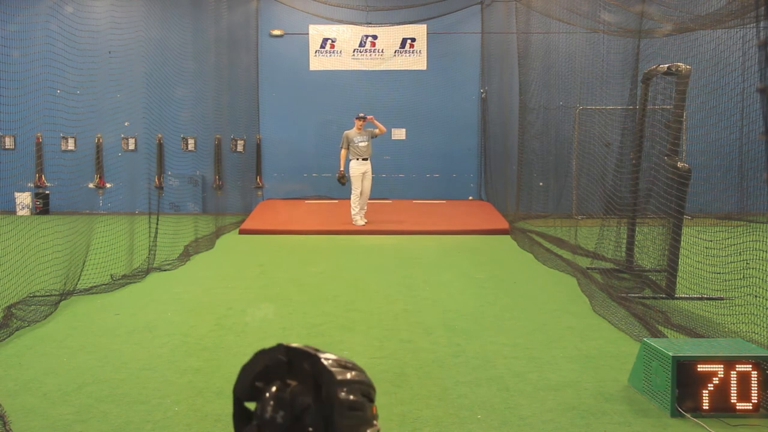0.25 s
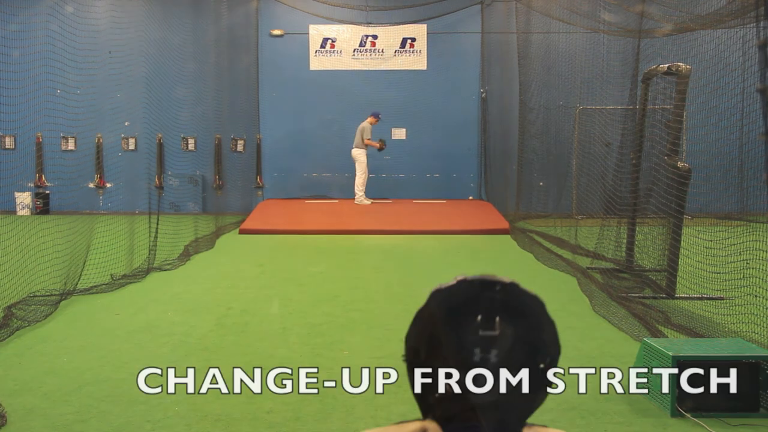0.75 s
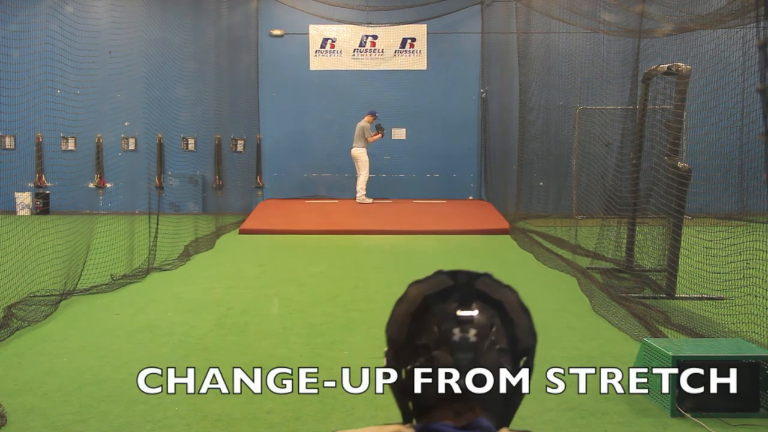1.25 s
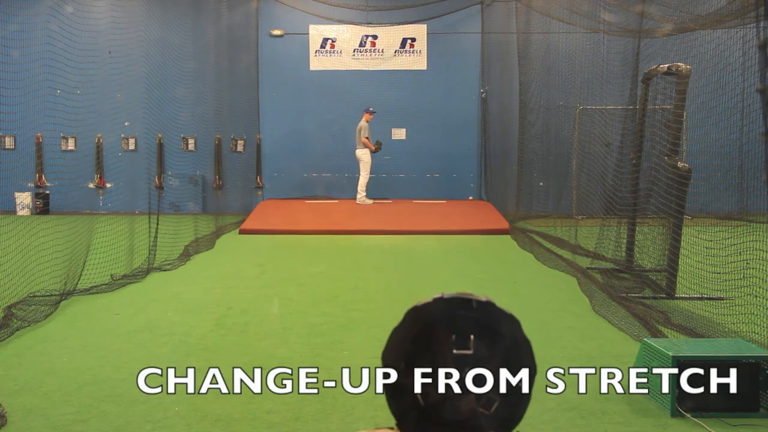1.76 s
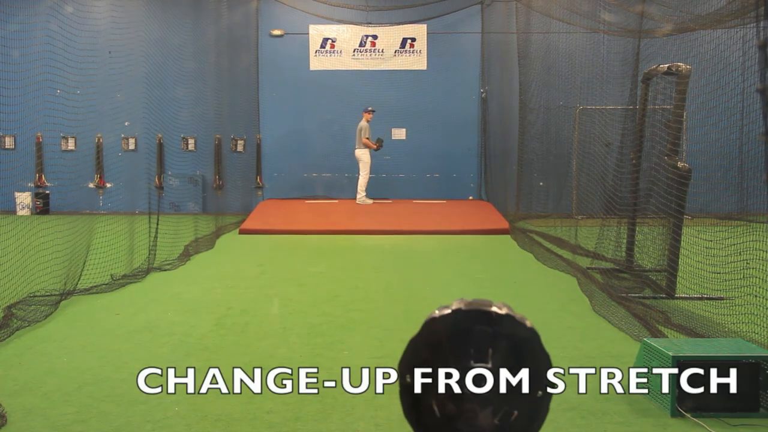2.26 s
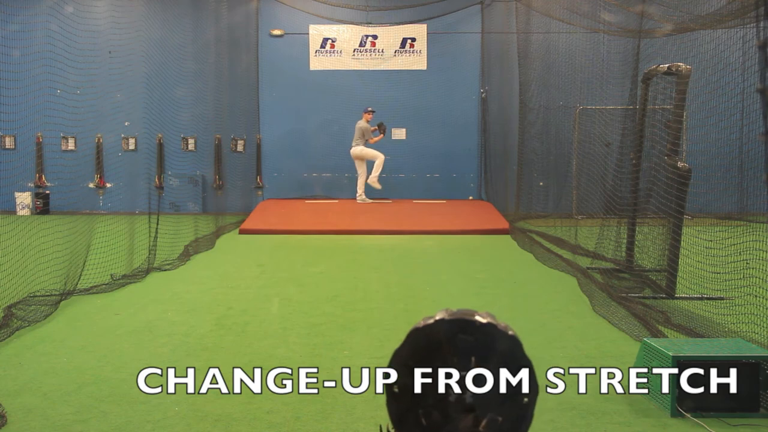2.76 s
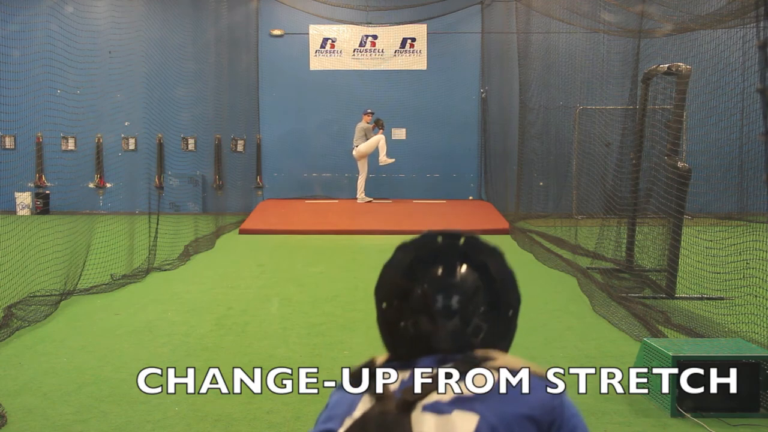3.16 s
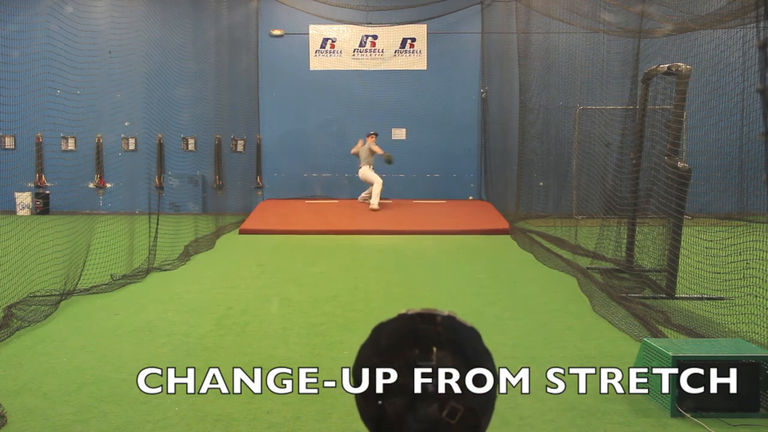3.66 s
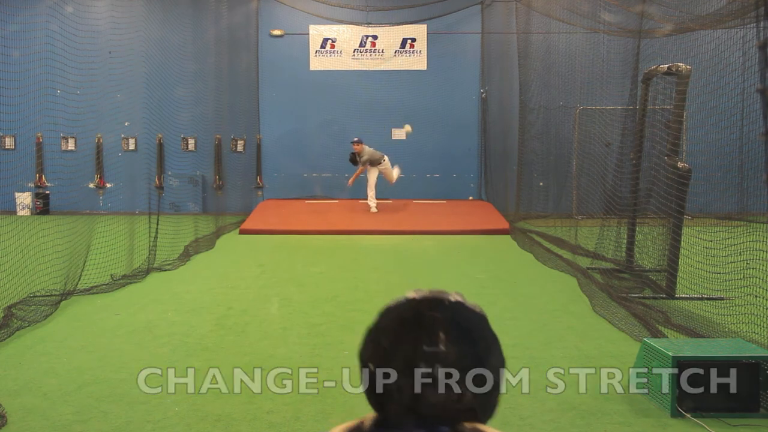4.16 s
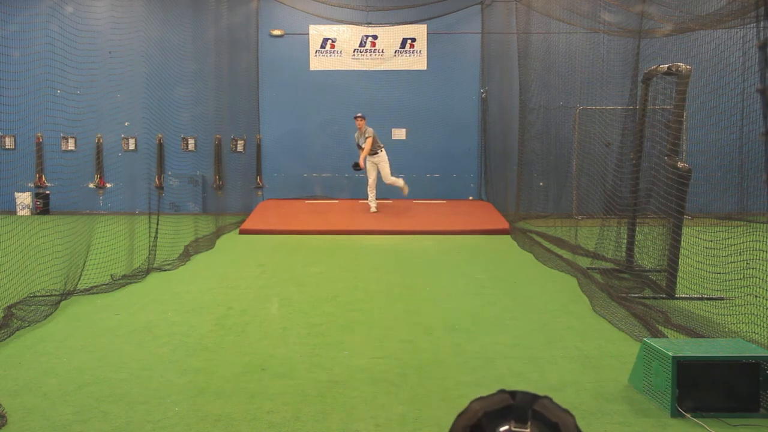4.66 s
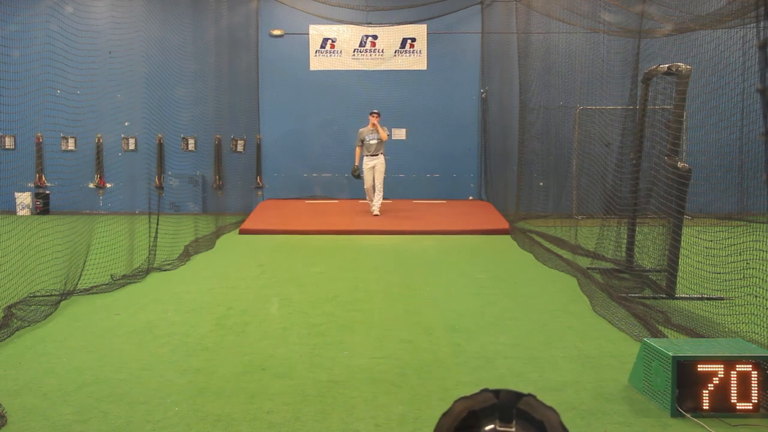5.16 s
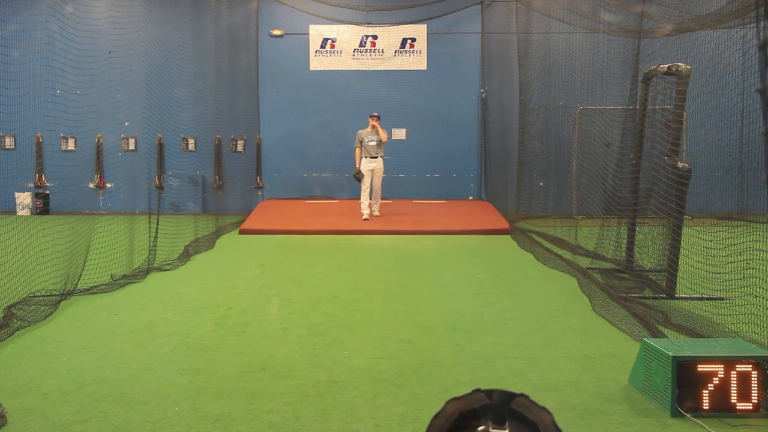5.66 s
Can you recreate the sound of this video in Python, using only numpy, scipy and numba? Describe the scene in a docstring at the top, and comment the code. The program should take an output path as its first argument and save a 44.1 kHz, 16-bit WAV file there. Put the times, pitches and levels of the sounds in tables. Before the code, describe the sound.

Low unsteady ventilation hum in a large hard-walled hall. Quiet fabric rubs and bright little buckle ticks, then a sharp shoe scuff on artificial turf and a muffled distant foot slide. Suddenly a ball hits a leather mitt near the microphone: a very loud, clipped, hollow pop. Slapping echoes bounce between the end walls, getting duller, while a mid-pitched reverberant ring slowly fades under a few faint clicks.

```python
"""An indoor batting cage, heard from just behind the catcher: wavering fan tones and filtered noise for air.
Noise swells for rubbing cloth and shoes dragging on turf, and short bursts tick for the catcher's gear.
The pitcher strides, and the ball smacks into the leather mitt: decaying sines plus bursts of noise.
Echo bursts and decaying bands of noise answer as the hall; the rubs and ticks are convolved with it.
The pop overloads the microphone; its gain control ducks, then recovers under the long ring."""
import sys
import numpy as np
from scipy import signal
from scipy.fft import rfft, irfft
from scipy.io import wavfile
from numba import njit

SR = 44100
rng = np.random.default_rng(int(sys.argv[2]) if len(sys.argv) > 2 else 0)


def store_pcm(level_fs):
    """Save levels as 16-bit WAV."""
    pcm = np.round(np.clip(level_fs, -1, 1) * 32767).astype(np.int16)
    wavfile.write(sys.argv[1], SR, np.atleast_2d(pcm).T)


N = 260278
T = np.arange(N) / SR  # seconds
FREQS = np.maximum(np.arange(N // 2 + 1) * SR / N, 1)  # Hz, kept above zero for logarithms
CATCH_S = 4.5516


def undb(db):
    """Level law: decibels to amplitude gain."""
    return 10 ** (np.asarray(db) / 20)


def unit(x):
    """Normalization: scale to rms 1."""
    return x / np.sqrt(np.mean(x ** 2))


def at(hz, table, axis=1):
    """Spectral interpolation: read a table's column on a log-frequency axis."""
    rows = np.array(table, float)
    return np.interp(np.log(hz), np.log(rows[:, 0]), rows[:, axis])


def noise(gain):
    """Spectral shaping: Gaussian noise of rms 1 with the given gain at each frequency."""
    spectrum = rng.standard_normal(len(FREQS)) + 1j * rng.standard_normal(len(FREQS))
    return unit(irfft(gain * spectrum, N))


def third(hz):
    """Band filtering: noise around one third-octave center, overlapping its neighbours."""
    power = np.maximum(1 - 3 * np.abs(np.log2(FREQS / hz)), 0)
    return noise(np.sqrt(power))


def dull(edge_hz):
    """First-order low-pass: gain of a gentle treble loss above the edge."""
    return 1 / np.sqrt(1 + (FREQS / edge_hz) ** 2)


def walk(rate_hz):
    """Random modulation: slow Gaussian noise of rms 1, limited to about the given rate."""
    return noise(np.exp(-np.minimum(FREQS / rate_hz, 20) ** 2))


def fade(start, t60):
    """Exponential decay: silence, then a fall of 60 dB in t60 seconds."""
    return (T >= start) * np.exp(-np.minimum(np.log(1000) * np.abs(T - start) / t60, 40))


def burst(start, t60, gain, size=32768):
    """Minimum-phase filtering: decaying noise is coloured without sounding before its start."""
    gain = np.interp(np.linspace(0, SR / 2, size // 2 + 1), FREQS, unit(gain))
    # folding the cepstrum forward in time makes the filter causal
    cepstrum = irfft(np.log(gain))
    cepstrum[1:size // 2] *= 2
    cepstrum[size // 2 + 1:] = 0
    grains = np.exp(-np.log(1000) * T[:size] / t60) * rng.standard_normal(size)
    sound = irfft(rfft(grains) * np.exp(rfft(cepstrum)))
    return np.concatenate([np.zeros(int(start * SR)), sound, np.zeros(N)])[:N]


def swell(peak_s, rise_s, fall_s):
    """Frictional envelope: the pressure of a rub rises smoothly to 1 and falls smoothly."""
    scale_s = np.where(T < peak_s, rise_s, fall_s)
    return 1 / np.cosh(np.clip((T - peak_s) / scale_s, -20, 20)) ** 2


# Fan and motor tones. Each row: frequency in Hz, mean level in dB rms, frequency wander in Hz.
HUM = [(57.6, -45, 0.34), (118.5, -49.5, 1.02), (181.6, -43, 2.69), (215.4, -40, 1.29), (243.5, -45, 0.91),
       (286.2, -44, 1.6), (353.6, -57, 1.13), (409.6, -53, 1.33), (461, -50, 1.34), (530, -51.5, 1.75),
       (678.4, -49.5, 3.06), (694, -42, 1.52), (1110, -61, 1.3), (1142, -58.5, 1.63), (1176, -59.5, 1.2)]
# Rush of the ventilation. Each row: frequency in Hz, relative level in dB per third octave.
AIR = [(25, -73.5), (45, -57), (75, -57), (130, -48), (200, -42), (290, -41.5), (400, -46.5), (600, -45),
       (900, -51), (1300, -52.5), (2500, -61), (5000, -68), (9000, -69), (12500, -71.5), (16000, -77)]


def fans(air_db=-35.5, flicker_db=1.0, waver_db=1.04):
    """Frequency and amplitude modulation: motor and blade tones waver in the rush of moving air."""
    tones = 0
    for hz, db, wander_hz in HUM:
        phase = 2 * np.pi * np.cumsum(hz + wander_hz * walk(5.58)) / SR
        level_db = db + waver_db * np.minimum(wander_hz, 1) * walk(8.0)
        tones = tones + np.sqrt(2) * undb(level_db) * np.sin(phase)
    air = noise(undb(at(FREQS, AIR)) / np.sqrt(FREQS))  # per third octave to per Hz
    return tones + undb(air_db + flicker_db * walk(10.0)) * air


# Ring of the hall. Each row: frequency in Hz, relative level in dB per third octave, t60 in seconds.
HALL = [(70, -49, 2), (121, -22.5, 1.4), (169, -16.5, 2.9), (245, -6, 2.63), (464, -4, 2.67),
        (680, -8, 2.7), (880, -4.5, 2.24), (1250, -7.5, 2.18), (1996, -3.5, 1.46), (2680, -11, 1.23),
        (4070, -10, 1.02), (8000, -17.5, 0.49), (12000, -20, 0.31), (16000, -31, 0.42)]
THIRDS = 25 * 2 ** (np.arange(29) / 3)  # third-octave centers, Hz


def hall_response(build_s=0.15, build_corner_hz=3000, far_wall_s=0.11, early_corner_hz=750,
                  early_bass=0.43, bloom_hz=900, bloom_width_hz=70, bloom_db=6.5):
    """Reverberation: treble arrives first and dies fast, lows gather late and stay."""
    ring = 0
    returned = np.clip((T - far_wall_s) / 0.0061, 0, 1)
    for hz in THIRDS[THIRDS > 50]:
        # most of the bass passes through the nets and only returns from the far wall
        early = max(early_bass, 1 / np.sqrt(1 + (early_corner_hz / hz) ** 4))
        gather = 1 - np.exp(-T * (1 + hz / build_corner_hz) / build_s)
        build = gather * (early + (1 - early) * returned)
        decay = fade(0, at(hz, HALL, axis=2))
        ring = ring + undb(at(hz, HALL)) * build * decay * third(hz)
    # one narrow band sings out over the rest
    bloom = 1 + (undb(bloom_db) - 1) / (1 + 1j * (FREQS - bloom_hz) / bloom_width_hz)
    return irfft(rfft(ring) * bloom, N)


# Rubbing fabric. Each row: frequency in Hz, relative level in dB per Hz.
CLOTH = [(300, -33.5), (900, -4), (1600, -4), (2400, -0.5), (3600, -8), (5200, -12), (10000, -16.5),
         (13000, -22.5), (16000, -34)]
# Weight shifts of the catcher. Each row: peak time in seconds, relative level in dB,
# time scale of rise and fall in seconds.
SHIFTS = [(0, -55, 0.075), (.54, -48, 0.21), (0.865, -54.5, 0.1), (2.35, -59.5, 0.1), (2.696, -56.5, .07),
          (2.98, -51.5, 0.076), (4.467, -47.5, 0.16), (5.22, -51.5, 0.14), (5.85, -62.5, .12)]


def clothes(rest_db=-63.5, cloth_db=1, grain_db=2.0):
    """Friction noise: clothes and pads rub in fine grains as the catcher shifts, never quite still."""
    effort = undb(rest_db) + sum(undb(db) * swell(s, scale_s, scale_s) for s, db, scale_s in SHIFTS)
    grain = undb(cloth_db + grain_db * walk(300))
    return effort * grain * noise(undb(at(FREQS, CLOTH)))


# Small ticks of the catcher's gear. Each row: start in seconds, relative level in dB, pitch in Hz.
TICKS = [(.233, -35, 8000), (.357, -35, 11000), (2.168, -36, 8000), (3.578, -42, 10500), (5.165, -35, 9500),
         (5.198, -32.5, 9500), (5.239, -37, 9500), (5.396, -34, 10600)]


def gear(tick_db=-9, t60=0.022, width_hz=2600, count=20, faint_db=-46, faint_hz=10500):
    """Impulsive excitation: buckles and straps tick brightly, with fainter ticks at random times."""
    faint = [(when * T[-1], faint_db, faint_hz) for when in rng.random(count)]
    ticks = 0
    for s, db, hz in TICKS + faint:
        band = 1 / (1 + ((FREQS - hz) / width_hz) ** 4)
        ticks = ticks + undb(db) * burst(s, t60, band)
    return undb(tick_db) * ticks


# Rub of a sole on turf. Each row: frequency in Hz, relative level in dB per Hz.
TURF = [(150, -25), (400, 2.5), (900, -2), (2000, -4.5), (4000, -9), (8000, -11.5), (12000, -13),
        (16000, -20.5)]
# Shoes dragging on turf. Each row: peak time in seconds, level of the push in dB before roughening,
# time scale of its rise and fall in seconds, treble edge in Hz.
SCUFFS = [(.27, -51, 0.084, 16000), (.55, -44, 0.036, 6000), (2.955, -48.5, 0.048, 8000),
          (3.121, -36.5, 0.045, 7000), (3.259, -27, 0.031, 9500), (3.79, -50.5, 0.13, 9000),
          (4.28, -40, 0.093, 16000)]
# the pitcher's stride lands and slides at the far end
STRIDE_S, STRIDE_DB, STRIDE_SCALE_S, STRIDE_EDGE_HZ = 4.05, -31.5, 0.12, 1020
# the sole slides on: weaker, longer and duller than the push
TRAIL_DB, TRAIL_RATIO, TRAIL_TREBLE_SHARE = -10.5, 5.3, 0.52


def shoes(grain_db=1.5):
    """Friction noise: a push and trailing slide, roughened by blades of turf flicking past the sole."""
    colour = undb(at(FREQS, TURF))
    stride = swell(STRIDE_S, STRIDE_SCALE_S, STRIDE_SCALE_S) * noise(colour * dull(STRIDE_EDGE_HZ))
    rubs = undb(STRIDE_DB) * stride
    for s, db, scale_s, edge_hz in SCUFFS:
        push = swell(s, scale_s, scale_s) * noise(colour * dull(edge_hz))
        trail_colour = colour * dull(TRAIL_TREBLE_SHARE * edge_hz)
        slide = swell(s, scale_s, TRAIL_RATIO * scale_s) * noise(trail_colour)
        rubs = rubs + undb(db) * (push + undb(TRAIL_DB) * slide)
    return rubs * undb(grain_db * walk(480))


def echo(start, t60, edge_hz):
    """Lossy reflection: the pop thrown back as a smeared burst that has lost its treble."""
    return burst(start, t60, undb(at(FREQS, SLAP)) * dull(edge_hz) * dull(3.1 * edge_hz) ** 2)


# The pop glances off the cage frame, ceiling and side walls.
# Each row: start in seconds, starting level in dB, t60 in seconds.
GLANCES = [(4.5700, 15, 0.02), (4.578, 6.5, 0.052), (4.614, 2, 0.065), (4.692, 2, 0.07)]
GLANCE_EDGE_HZ = 11000
# then it shuttles between the end walls, weaker and duller on every trip
FIRST_RETURN_S, ROUND_TRIP_S, TRIP_LOSS_DB, TRIP_TREBLE_SHARE = 4.672, 0.168, 4.5, 0.28


def echoes(boom_db=2, boom_t60=0.14, boom_edge_hz=600, scatter_db=-0.5, scatter_t60=0.3,
           scatter_edge_hz=7000, scatter_lag_s=0.009):
    """Flutter echo: near surfaces answer once, end walls return a boom trailed by scatter from nets."""
    returns = sum(undb(db) * echo(s, t60, GLANCE_EDGE_HZ) for s, db, t60 in GLANCES)
    for trip in range(4):
        start = FIRST_RETURN_S + trip * ROUND_TRIP_S
        boom = undb(boom_db) * echo(start, boom_t60, boom_edge_hz)
        edge_hz = boom_edge_hz + scatter_edge_hz * TRIP_TREBLE_SHARE ** trip
        scatter = undb(scatter_db) * echo(start + scatter_lag_s, scatter_t60, edge_hz)
        returns = returns + undb(-TRIP_LOSS_DB * trip) * (boom + scatter)
    return returns


# Modes of the mitt's pocket. Each row: frequency in Hz, starting level in dB before the bass loss,
# t60 in seconds.
POCKET = [(112, 9, 0.057), (256, 9, 0.15), (333, 18.5, 0.072), (458.8, 23.5, 0.08), (549, 20.5, 0.077),
          (860, 19.5, 0.033), (1077, 17.5, 0.032), (1247, 19, 0.015), (1520, 0, 0.024), (1956, 18.5, 0.014),
          (2690, 22, 0.0075)]
# Slap of leather on leather, also thrown back by echo(). Each row: frequency in Hz,
# relative level in dB per Hz.
SLAP = [(40, -27.5), (150, -8), (350, 7), (1200, 2), (2500, -9.5), (5000, -15.5), (10000, -23),
        (14000, -33), (18000, -47)]


def pocket(slap_lag_s=0.001352, radiate_hz=90):
    """Modal resonance: the ball's blow rings the hollow of the mitt, and the leather slaps shut."""
    age = T - CATCH_S
    thump = 0
    for hz, db, t60 in POCKET:
        thump = thump - undb(db) * fade(CATCH_S, t60) * np.sin(2 * np.pi * hz * age)
    # a small body radiates little bass
    thump = signal.lfilter(*signal.butter(1, radiate_hz, "high", fs=SR), thump)
    colour = undb(at(FREQS, SLAP))
    slap = undb(16.5) * burst(CATCH_S + slap_lag_s, 0.0061, colour * (1 - dull(750)))
    # turf, mask and pads scatter it at once
    nearby = undb(8.0) * burst(CATCH_S + slap_lag_s, 0.18, colour)
    return thump + slap + nearby


def scene(shoes_hall_db=-5.0, clothes_hall_db=-11, stir_hz=560):
    """Superposition: the catch and the players' movements share one hall."""
    hall = hall_response()
    ring = np.concatenate([np.zeros(int(CATCH_S * SR)), hall])[:N]
    feet = shoes()
    rustle = clothes() + gear()
    # rubbing is bright, so it stirs little of the hall's low ring
    moves = undb(shoes_hall_db) * feet + undb(clothes_hall_db) * rustle
    stirred = irfft(rfft(moves) * (1 - dull(stir_hz)), N)
    moves_ring = signal.fftconvolve(stirred, hall / np.sqrt(np.sum(hall ** 2)))[:N]
    return (fans() + ring + moves_ring + rustle + feet + echoes() + pocket())[None]


@njit
def follow(size, attack, release):
    """Envelope detection: the level rises quickly and lets go slowly."""
    out, level = np.empty(len(size)), 0.
    for i in range(len(size)):
        level += (size[i] - level) * (attack if size[i] > level else release)
        out[i] = level
    return out


def record(dry, attack_s=0.017, release_s=0.4, threshold_db=-5, soften_hz=13500, top_hz=15900):
    """Compression and overload: gain control too slow for the pop, hard clipping, a cut-off top."""
    held = follow(np.abs(dry[0]), 1 / (attack_s * SR), 1 / (release_s * SR))
    gain = 1 / np.maximum(held / undb(threshold_db), 1)
    clipped = np.clip(dry * gain, -.98, .98)
    soft = signal.lfilter(*signal.butter(1, soften_hz, fs=SR), clipped)
    return signal.fftconvolve(soft, signal.firwin(255, top_hz, fs=SR)[None], mode="same")


dry = scene()
out = record(dry)
store_pcm(out)
```